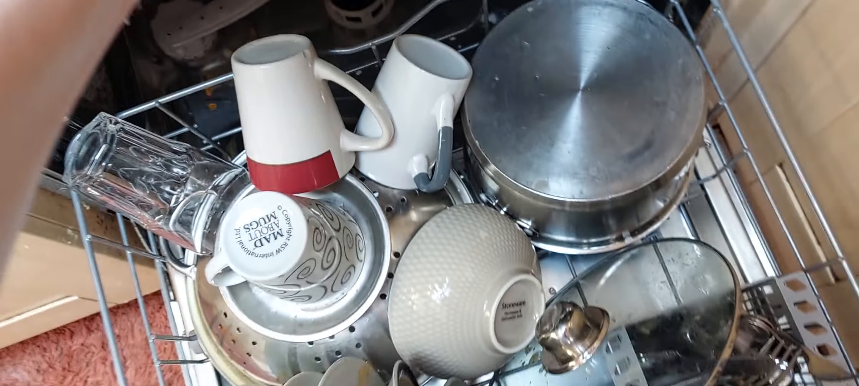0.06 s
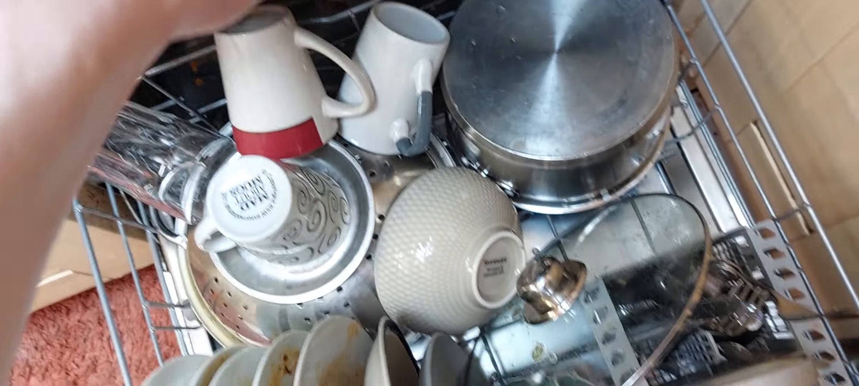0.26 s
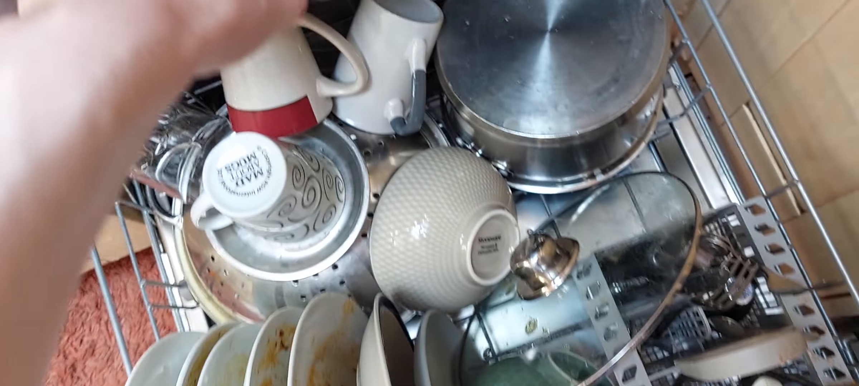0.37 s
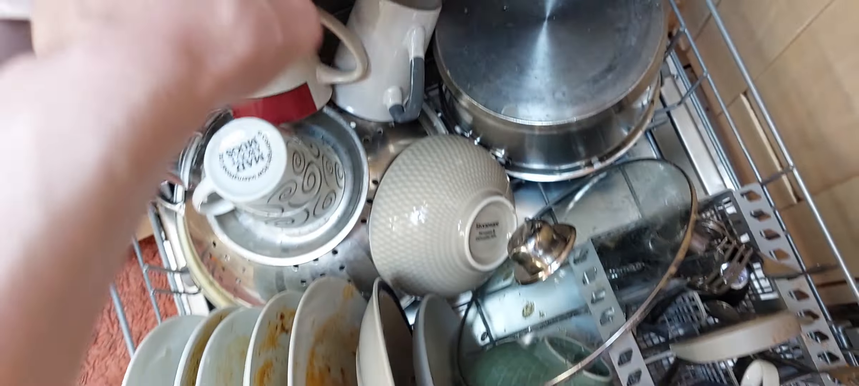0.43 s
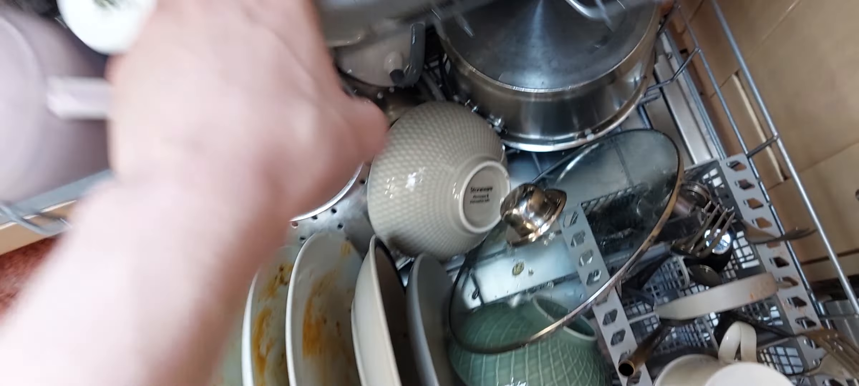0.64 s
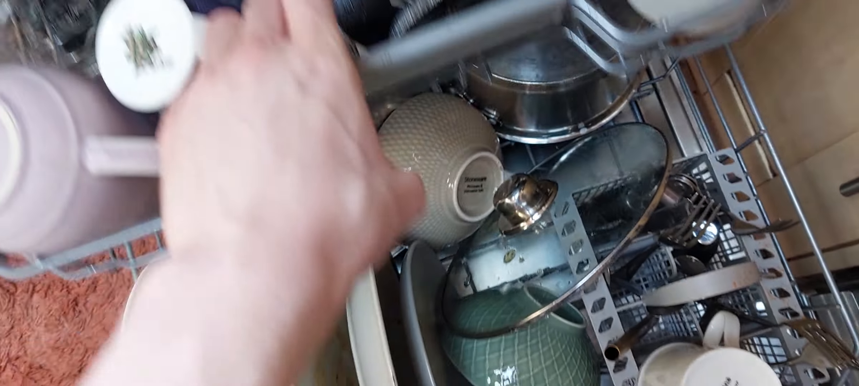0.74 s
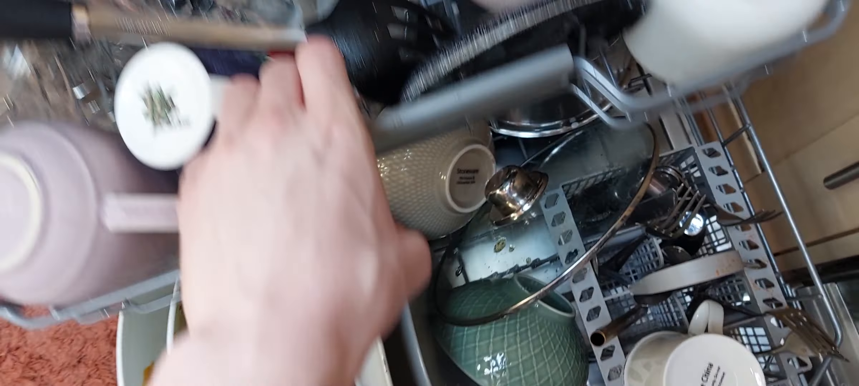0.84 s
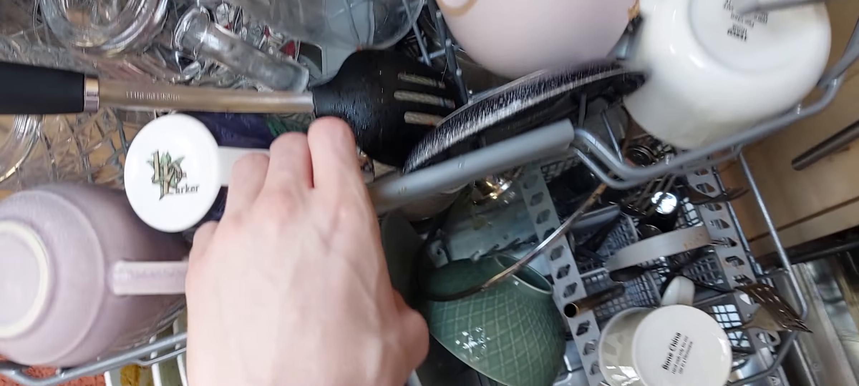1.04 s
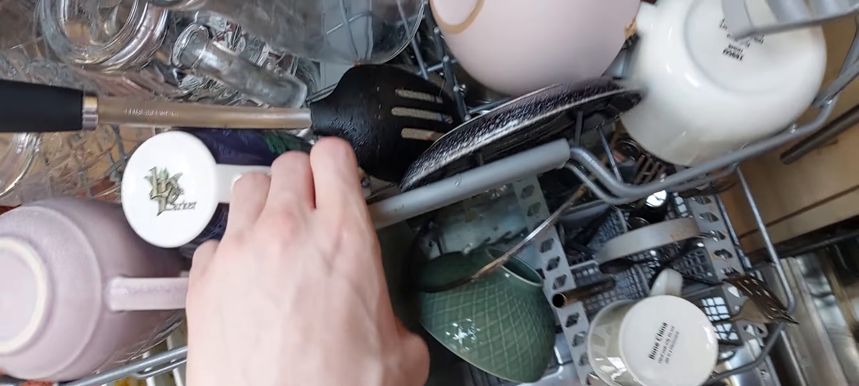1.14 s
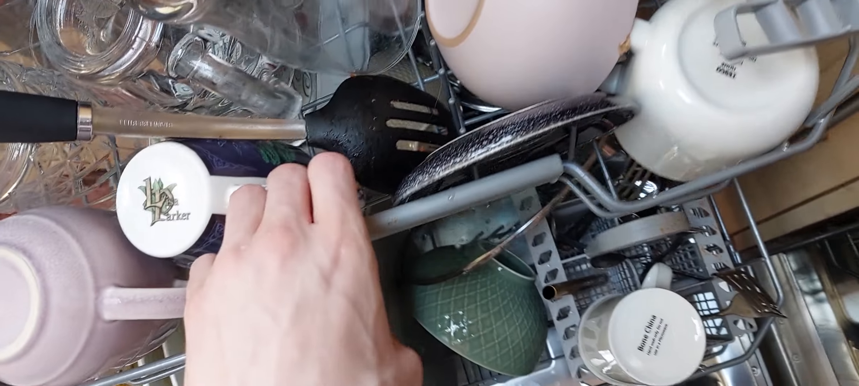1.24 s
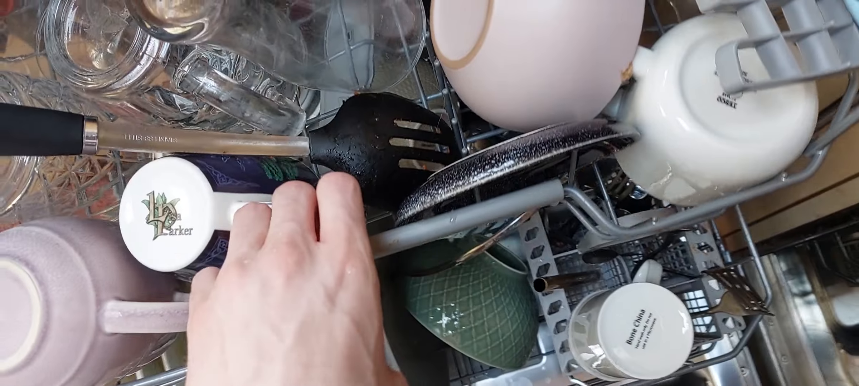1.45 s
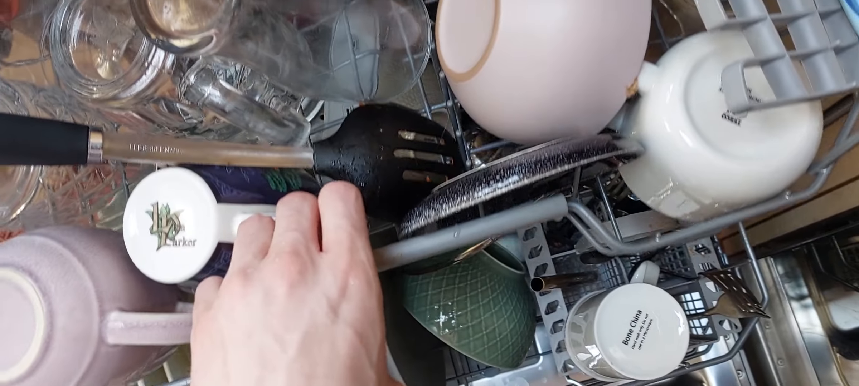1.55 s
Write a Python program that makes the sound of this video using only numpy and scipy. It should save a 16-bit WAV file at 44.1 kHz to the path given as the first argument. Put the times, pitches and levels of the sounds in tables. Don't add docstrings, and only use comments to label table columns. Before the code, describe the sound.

Over soft fan hum, a rack of dishes is pushed on small wheels, bumping and clinking harder until it bangs against its stop, leaving a brief glassy shiver; recorded close in a small kitchen, slightly to the right.

```python
import sys
import numpy as np
from scipy import signal
from scipy.fft import rfft, irfft
from scipy.io import wavfile
from scipy.ndimage import uniform_filter1d

SR = 44100
rng = np.random.default_rng(int(sys.argv[2]) if len(sys.argv) > 2 else 0)


def master_out(mix):
    frames = np.transpose(np.atleast_2d(mix))
    ceiling = np.clip(frames, -1, 1)
    pcm = np.round(ceiling * 32767).astype(np.int16)
    wavfile.write(sys.argv[1], SR, pcm)


def linear_from_db(decibels):
    return 10 ** (np.asarray(decibels, float) / 20)


N = 70560

# f/Hz, density/dB
FAN_AIR = [(18, -53.5), (30, -35), (86, -11), (245, -14), (280, -2), (345, -15), (1190, -29), (2060, -28.5),
           (16000, -48.5)]
# f/Hz, width/Hz, level/dB
FAN_DUCT = [(227.8, 22, -1.5), (279, 26, -5), (2100, 26, -13), (2050, 960, -8.5), (2534, 215, -11),
            (4700, 1900, -22)]
# start/s, end/s, f/Hz, width/Hz, level/dB
TREMBLES = [
    (0.93, 1.06, 2625, 80, -55.5),
    (0.87, 1.08, 5530, 510, -60),
    (1.17, 1.26, 5530, 250, -64.5),
    (1.09, 1.24, 2660, 260, -67),
    (.96, 1.22, 224.4, 50, -43.5),
    (.94, 1.1, 11000, 6500, -67.5),
    (1.305, 1.63, 4500, 1200, -64.5),
    (0.94, 1.323, 4800, 3800, -64.5),
    (.96, 1.21, 279.6, 22, -51),
]
# t/s, level/dB
ROLL_EFFORT = [(0, -39.5), (.016, -46.5), (.172, -46), (.2, -35.5), (.346, -36), (0.385, -38), (.454, -33),
               (.606, -34.5), (.66, -33), (.72, -31), (.77, -32), (.82, -36.5), (.87, -27), (0.928, -38.5),
               (.966, -40.5), (1.184, -50), (1.23, -52.5), (1.6, -52)]
# f/Hz, width/Hz, level/dB
TUB_MODES = [(62.8, 23.5, 0.5), (111.6, 18.3, -2), (138, 44.4, -2.5), (218.4, 37, -5), (291, 21.2, -4),
             (430, 135, -7.5), (525, 204, -7), (814, 250, -13.5)]
# t/s, f/Hz, level/dB, t60/s
THUDS = [(.2196, 543, -19.5, 0.034), (.24, 471, -38, 0.064), (.18, 600, -32, .1), (0.17, 650, -31.5, 0.053),
         (.2, 620, -33, 0.095), (.184, 880, -40, 0.066), (.272, 640, -32.5, 0.1), (.2832, 715, -32, .14),
         (.271, 486, -32.5, 0.056), (0.25, 500, -39, 0.055), (.265, 289, -34, .12), (.258, 600, -34, .05),
         (.315, 120, -27, 0.24), (0.32, 156, -39, 0.059), (.442, 105, -28, .08), (.497, 85, -27, .08),
         (.58, 110, -31, .07), (.49, 270, -34, .12), (.632, 60, -27, .15), (.6225, 106.7, -16, 0.12),
         (.6245, 290, -20, 0.22), (.652, 305, -25.5, 0.097), (.662, 308, -25.5, 0.058),
         (.627, 1100, -32, .07), (.646, 1030, -35, .06), (.63, 707, -31.5, 0.11), (0.56, 206, -34, .09),
         (.18, 282, -35.5, 0.13), (.216, 280, -35, .08), (0.0603, 112, -38.5, 0.3), (.43, 285, -37.5, 0.85),
         (.6915, 502, -21, 0.064), (.690, 99, -23, 0.096), (.7225, 105, -22, 0.09), (.746, 85, -26, .12),
         (.739, 530, -27, 0.073), (.7466, 535, -20.5, 0.068), (.737, 1250, -31.5, .07),
         (.742, 920, -32.5, 0.119), (.028, 1600, -40, 0.028), (.8405, 117.6, -15.5, 0.18),
         (.847, 652, -21.5, 0.055), (.848, 506, -31, 0.037), (.842, 730, -39, 0.041), (0.75, 72, -27, 0.13),
         (.752, 264, -32, 0.078), (.755, 620, -23.5, 0.061), (.885, 328, -33.5, 0.16),
         (.912, 80.5, -21.5, 0.073)]
# t/s, f/Hz, level/dB, t60/s
CHINKS = [(.587, 2800, -40, 0.048), (.855, 3170, -32, 0.053), (0.26, 1700, -51, 0.04),
          (.46, 2100, -36, 0.12), (.684, 3130, -31, 0.054), (.693, 3090, -30, 0.072),
          (0.65, 3100, -34, 0.0301), (.736, 2290, -23.5, .06), (.838, 4910, -16, .016),
          (.842, 5540, -30, 0.033), (.8425, 6690, -29, 0.046), (.851, 3330, -29, 0.043),
          (.4355, 4300, -36, .02), (.458, 5140, -37, .015), (0.43, 4600, -36, .015), (0.39, 1900, -39, .08),
          (.6125, 5600, -34, .015), (.734, 7900, -29, 0.044), (.738, 3060, -30.5, .06),
          (.748, 3400, -31, .04), (.627, 14200, -40, .05), (0.95, 2400, -49, .3), (1.04, 2630, -54, 0.25),
          (.840, 11300, -21, 0.024)]
# t/s, level/dB, rattle length/s, t60/s
BLOWS = [
    (.7345, -27, 0.015, 0.039),
    (0.838, -17, 0.002, 0.035),
    (0.8421, -17.5, 0.0006, 0.01),
    (.845, -33.5, 0.0072, 0.074),
]
# t/s, wire level/dB, rattle length/s, crockery level/dB, cutlery level/dB
JOLTS = [(0, -55, 0.0026, -56.5, -62), (0.027, -41, 0.008, -81, -72), (0.175, -37, 0.024, -54.5, -56),
         (0.191, -36, 0.016, -57, -61), (0.2144, -36.5, 0.008, -52, -85), (0.262, -40.5, 0.013, -56, -62),
         (0.431, -48, 0.004, -42, -65.5), (0.4368, -39.5, 0.0045, -42.5, -61),
         (0.4418, -37.5, 0.012, -41, -66), (0.4445, -50, 0.012, -59, -41), (0.4573, -41, 0.003, -39, -58),
         (0.464, -38.5, 0.019, -43.5, -58), (0.4925, -35.5, 0.0033, -37, -60),
         (0.499, -38, 0.0096, -42.5, -63), (0.5197, -43.5, 0.012, -60, -65.5),
         (0.576, -42.5, 0.0049, -40.5, -53), (0.586, -42, 0.0072, -43.5, -52),
         (0.6112, -36, 0.0025, -35.5, -59), (0.624, -29, 0.012, -32.5, -50),
         (0.6261, -45.5, 0.013, -48.5, -34.5), (0.64, -33, 0.015, -46.5, -42),
         (0.652, -39.5, 0.01, -46, -47), (0.6827, -42, 0.007, -45, -60), (0.697, -36.5, 0.039, -42, -51),
         (0.721, -30.5, 0.01, -42, -44), (0.7341, -24, 0.016, -28, -46), (0.746, -24, 0.011, -29, -54),
         (0.8382, -21.5, 0.0017, -18, -17.5), (0.856, -25.5, 0.0069, -46, -45)]
# f/Hz, width/Hz, ring share/dB, ring t60/s, level offset/dB
PARTS = [
    (1790, 2100, -6, 0.075, -7.5),
    (5130, 3940, -12.5, 0.03, -3),
    (13600, 6660, -11.5, 0.043, -6),
]
RINGS_HZ = [
    [706, 1010, 1019, 1525, 1708, 1940, 2100, 2288, 2393, 2890],
    [3820, 4330, 5500, 4880, 7250, 6330, 6700, 5220],
    [7500, 11100, 12800, 12600, 11800, 15200, 14400],
]

FAN_DB, DUCT_DB, FAN_WIDE_HZ = -49, 0.5, 700
ROLL_DB, BUMPS_PER_S, BUMP_SPREAD_DB = -2.5, 2600, 0.8
SCRAPE_DB, SCRAPE_GROWTH, SCRAPE_AT_DB = -14.5, 0.38, -35.5
CONTACTS_PER_S, CONTACT_SPREAD_DB = 5000, 2.5
ATTACK_S, FADE_T60_S, PLACE_SPREAD_S = 0.00041, 0.023, 0.00022
FRAME_HZ, FRAME_WIDTH_HZ, FRAME_DB = 500, 900, -9.5
ROOM_T60_S, ROOM_DB, ROOM_LOW_HZ = 0.27, -4, 500
SCATTER_T60_S, SCATTER_DB = 0.0385, -3.5
LEFT_BASS_DB, LEFT_TREBLE_DB, RIGHT_LATE_S, PORT_HZ = -2.5, -4.5, 0.00018, 603
HISS_DB, TOP_HZ = -72, 15850


def unit(x):
    return x / np.sqrt(np.mean(x ** 2) + 1e-30)


def band(x, hz, width_hz):
    return signal.lfilter(*signal.iirpeak(hz, hz / width_hz, fs=SR), x)


def band_twice(x, hz, width_hz, second_width_hz):
    return band(band(x, hz, width_hz), hz, second_width_hz)


def walk(rate_hz):
    k = int(SR / rate_hz)
    return unit(uniform_filter1d(uniform_filter1d(rng.standard_normal(N), k), k))


def contacts(per_s, spread_db, size):
    chance, sign, strength = rng.random((size, 3)).T
    hit = chance < per_s / SR
    return unit(hit * np.sign(sign - 0.5) * linear_from_db(-spread_db * np.log(strength + 0.015)))


def add(out, x, start_s):
    i = int(start_s * SR)
    out[..., i:i + x.shape[-1]] += x[..., :N - i]


def delayed(x, delay_s, size):
    f = np.fft.rfftfreq(size, 1 / SR)
    return irfft(rfft(x, size) * np.exp(-2j * np.pi * f * delay_s), size)[:len(x)]


def placed(x, chance):
    return np.array([x, delayed(x, chance * PLACE_SPREAD_S, 2 * len(x))])


def fan():
    f = np.fft.rfftfreq(N, 1 / SR) + 1
    hz, db = np.array(FAN_AIR).T
    mid, side = rfft(rng.standard_normal((2, N)))
    raw = irfft(mid + side * np.array([[1], [-1]]) / np.hypot(1, FAN_WIDE_HZ / f), N)
    air = irfft(rfft(raw) * linear_from_db(np.interp(np.log(f), np.log(hz), db)), N)
    duct = sum(linear_from_db(level_db + 2.0 * walk(13.6)) * unit(band_twice(raw, c, w, 2 * w))
               for c, w, level_db in FAN_DUCT)
    return linear_from_db(FAN_DB) * unit(unit(air) * linear_from_db(1.3 * walk(2.4)) + linear_from_db(DUCT_DB) * unit(duct))


def reflections(x, t60_s, db):
    t = np.arange(int(0.5 * SR)) / SR
    tail = rng.standard_normal((2, len(t))) * linear_from_db(-60 * t / t60_s)
    tail = signal.sosfilt(signal.butter(2, ROOM_LOW_HZ, "high", fs=SR, output="sos"), tail)
    tail = tail / np.sqrt(np.sum(tail ** 2, axis=1, keepdims=True))
    return linear_from_db(db) * signal.fftconvolve(x[None], tail, axes=1)[:, :N]


def shiver():
    t = np.arange(N) / SR
    out = np.zeros(N)
    for start, end, hz, width, db in TREMBLES:
        swell = np.interp(t, [start, start + 0.025, end - 0.04, end], [0.055, 0.75, 0.7, 0.0063])
        out += linear_from_db(db) * swell * unit(band_twice(rng.standard_normal(N), hz, width, 2 * width))
    return out


def wheels():
    t, db = np.array(ROLL_EFFORT).T
    bumps = contacts(BUMPS_PER_S, BUMP_SPREAD_DB, N)
    tub = sum((-1) ** k * linear_from_db(level_db) * unit(band_twice(bumps, hz, width, 3 * width))
              for k, (hz, width, level_db) in enumerate(TUB_MODES))
    grit = contacts(4000, 3.0, N)
    scrape = unit(band(band(grit, 1500, 2200), 1600, 3900))
    scrape = scrape + linear_from_db(-12.5) * unit(band_twice(grit, 13000, 5200, 5200))
    effort_db = np.interp(np.arange(N) / SR, t, db)
    scrape_db = SCRAPE_DB + SCRAPE_GROWTH * (effort_db - SCRAPE_AT_DB)
    return linear_from_db(effort_db + ROLL_DB) * (unit(tub) + linear_from_db(scrape_db) * scrape)


def struck(table, push_cycles):
    out, t = np.zeros(N), np.arange(int(0.4 * SR)) / SR
    for s, hz, db, t60 in table:
        start = 1 - np.exp(-t * hz / push_cycles)
        add(out, linear_from_db(db - 60 * t / t60) * np.sin(2 * np.pi * hz * t) * start, s)
    return out


def blows():
    out, t = np.zeros((2, N)), np.arange(int(0.2 * SR)) / SR
    for s, db, length, t60 in BLOWS:
        x = sum(placed(contacts(3000, 1.7, len(t)), c) for c in rng.uniform(-1.86, 1.97, 3))
        fade_db = -60 * np.maximum(t - length, 0) / t60
        add(out, band(unit(x), 6260, 12800) * linear_from_db(db + fade_db), s)
    return out


def rattle():
    out, t = np.zeros((2, N)), np.arange(int(0.2 * SR)) / SR
    for s, wire_db, length, crockery_db, cutlery_db in JOLTS:
        fade_db = -60 * np.maximum(t - length, 0) / FADE_T60_S - 3.1 * np.minimum(t / length, 1)
        shape = np.minimum(t / ATTACK_S, 1) * linear_from_db(fade_db)
        k = int((length + 0.0058) * SR)
        levels_db = wire_db, crockery_db, cutlery_db
        for db, (hz, width, ring_db, t60, offset_db), rings in zip(levels_db, PARTS, RINGS_HZ):
            part = 0
            ring_width_hz = 2.9 / max(t60, 0.005)
            for chance in rng.uniform(-2.09, 1.956, 3):
                x = contacts(CONTACTS_PER_S / 3, CONTACT_SPREAD_DB, len(t)) * shape
                body = band_twice(x, hz, width, width)
                gains = rng.standard_normal(len(rings))
                ring = sum(g * band(x, f, ring_width_hz) for f, g in zip(rings, gains))
                ring = ring * np.std(body) / np.std(ring)
                part = part + placed(body + linear_from_db(ring_db) * ring, chance)
            add(out, linear_from_db(db + offset_db) * part / np.std(part[:, :k]), s)
        frame = band_twice(x, FRAME_HZ, FRAME_WIDTH_HZ, FRAME_WIDTH_HZ)
        add(out, linear_from_db(wire_db + FRAME_DB) * frame / np.std(frame[:k]), s)
    return out - 0.57 * band(out, 9000, 3000)


def scene():
    rack = rattle() + blows() + struck(THUDS, 0.4) + struck(CHINKS, 1.5) + wheels() + shiver()
    f = np.fft.rfftfreq(N, 1 / SR)
    treble = f / np.hypot(f, PORT_HZ)
    both = np.array([rack[0], delayed(rack[1], treble * RIGHT_LATE_S, N)])
    both = both + reflections(rack[0], SCATTER_T60_S, SCATTER_DB)
    both = both + reflections(rack[0], ROOM_T60_S, ROOM_DB) + fan()
    pan_db = LEFT_BASS_DB + (LEFT_TREBLE_DB - LEFT_BASS_DB) * treble
    return irfft(rfft(both) * linear_from_db(np.array([pan_db, -pan_db]) / 2), N)


def band_limit(x):
    return signal.sosfilt(signal.butter(12, 17090, fs=SR, output="sos"), x)


def record(dry):
    x = dry + linear_from_db(HISS_DB) * band(rng.standard_normal(dry.shape), 15000, 6700)
    x = signal.sosfilt(signal.butter(3, 45, "high", fs=SR, output="sos"), x)
    x = signal.sosfilt(signal.ellip(8, 0.3, 50, TOP_HZ, fs=SR, output="sos"), x)
    return band_limit(x)


dry = scene()
out = record(dry)
master_out(out)
```